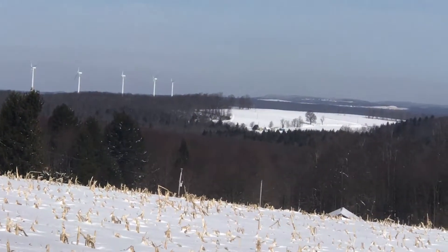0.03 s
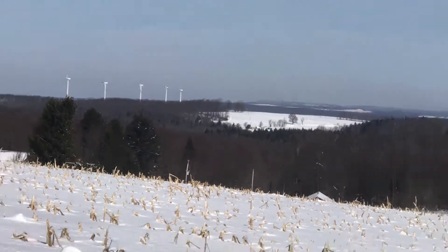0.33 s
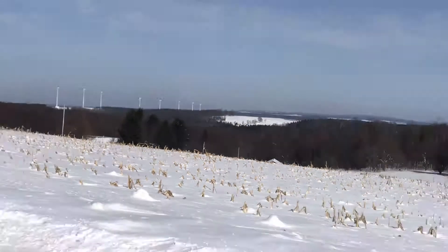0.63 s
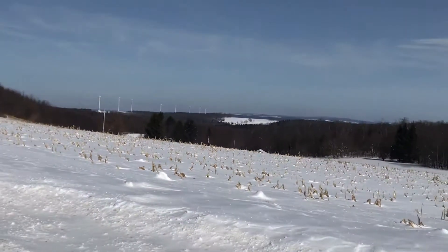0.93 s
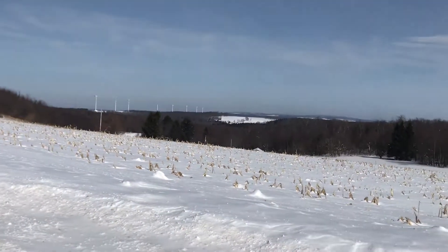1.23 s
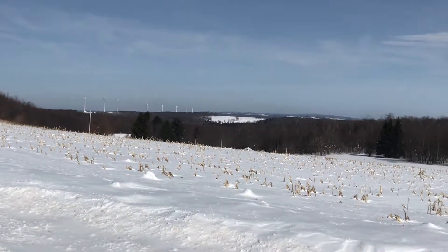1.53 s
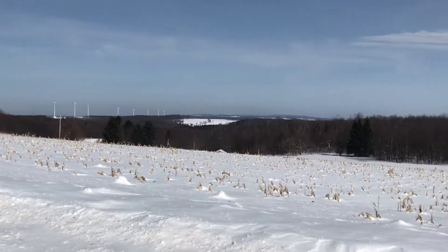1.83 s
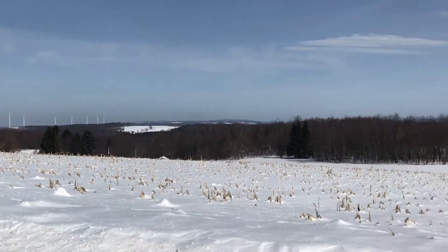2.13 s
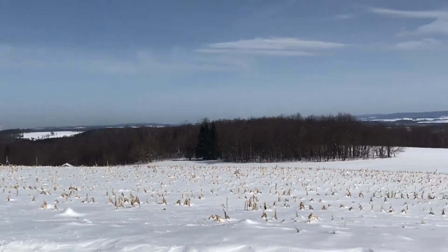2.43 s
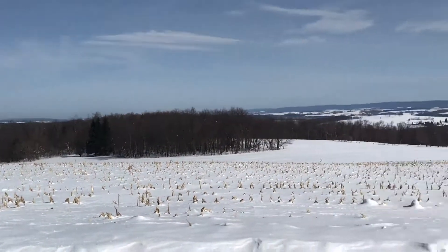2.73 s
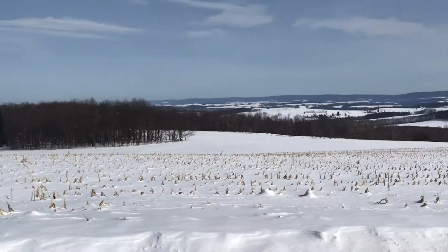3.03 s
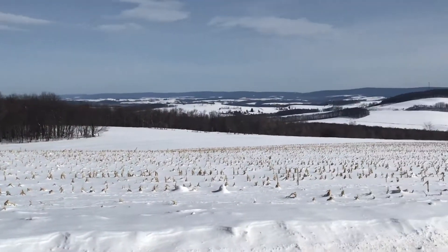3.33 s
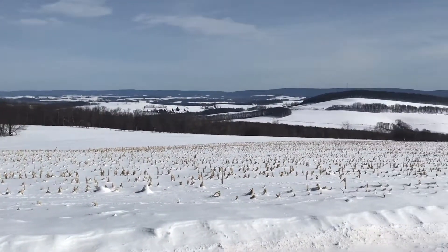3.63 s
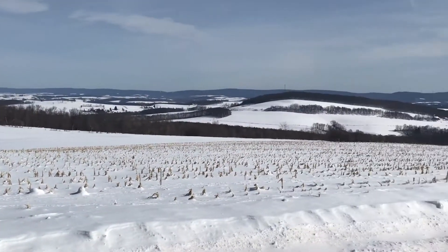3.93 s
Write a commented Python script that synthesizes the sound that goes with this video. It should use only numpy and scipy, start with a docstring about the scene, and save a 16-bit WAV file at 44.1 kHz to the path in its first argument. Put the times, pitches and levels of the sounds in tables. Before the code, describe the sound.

Light wind rushing over a faint low hum, briefly buffeting the microphone.

```python
"""A snowy field in a light wind, heard through a hand-held microphone that pans slowly across it.
From the start, turbulent air rushes over a low hum, probably an idling engine; faint whistles come and go.
At about 1 s a short gust buffets the microphone with eddies. From 2.1 to 3.2 s the microphone turns and
the rush changes colour, while a sleeve or glove rustles and ticks faintly against the camera."""
import sys
import numpy as np
from scipy import signal
from scipy.fft import rfft, irfft
from scipy.io import wavfile
from scipy.ndimage import uniform_filter1d

SR = 44100
rng = np.random.default_rng(int(sys.argv[2]) if len(sys.argv) > 2 else 0)


def store_wav(level_fs):
    """Save 16-bit WAV to argv[1]."""
    pcm = np.round(np.clip(np.atleast_2d(level_fs), -1, 1) * 32767)
    wavfile.write(sys.argv[1], SR, pcm.T.astype(np.int16))


N = 176400
TIME = np.arange(N) / SR


def from_db(db):
    """The decibel scale: amplitude grows tenfold for every 20 dB."""
    return 10 ** (np.asarray(db) / 20)


def unit_rms(x):
    """Normalisation to an rms of 1."""
    return x / np.sqrt(np.mean(x ** 2) + 1e-20)


def drift(corner_hz):
    """Low-pass filtering of noise gives a smooth random fluctuation; rms 1."""
    step, settling = 40, 2000
    pole = np.exp(-2 * np.pi * corner_hz * step / SR)
    white = rng.standard_normal(N // step + settling + 2)
    slow = signal.lfilter([1], [1, -2 * pole, pole * pole], white)[settling:]
    return np.interp(np.arange(N) / step, np.arange(len(slow)), unit_rms(slow))


def coloured(white, spectrum):
    """Spectral shaping of noise, falling a further 24 dB per octave below the first point; rms 1."""
    hz, db = np.transpose(spectrum)
    f = np.maximum(np.arange(N // 2 + 1) * SR / N, 1)
    gain = from_db(np.interp(np.log(f), np.log(hz), db)) * np.minimum(f / hz[0], 1) ** 4
    return unit_rms(irfft(rfft(white) * gain, N))


def band_noise(low_hz, high_hz):
    """Band-pass filtering gives stationary noise between two edges; rms 1."""
    edges_hz = [low_hz, np.clip(high_hz, low_hz + 10, SR / 2 - 20)]
    band = signal.butter(2, edges_hz, "band", fs=SR, output="sos")
    return unit_rms(signal.sosfilt(band, rng.standard_normal(N + SR // 10))[-N:])


def bells(rows):
    """Gaussian envelopes, summed: each has a peak time, a standard deviation and a peak level."""
    return sum(from_db(db) * np.exp(-.5 * ((TIME - peak) / sigma) ** 2) for peak, sigma, db in rows)


def engine_hum():
    """Periodic firing gives harmonics, which follow the slightly wandering rate of the idle."""
    # multiples of the firing rate
    orders = (2, 3, 6)
    # strength of each harmonic: level/dB
    levels = (-54, -53, -56)
    firing_hz, wander, waver_db = 21.2, 0.0114, 1
    phase = 2 * np.pi * np.cumsum(firing_hz * (1 + wander * drift(0.452))) / SR
    hum = np.zeros(N)
    for order, db in zip(orders, levels):
        amplitude = np.sqrt(2) * from_db(db + waver_db * drift(0.86))
        hum += amplitude * np.sin(order * phase + 2 * np.pi * rng.random())
    return hum


def rumble():
    """Turbulence at the microphone makes deep, steady pressure noise."""
    # spectral density: f/Hz, relative level/dB
    spectrum = [(38, 0.5), (52, -1.5), (66, 2), (90, -22), (300, -50), (15000, -120)]
    return from_db(-48.5) * coloured(rng.standard_normal(N), spectrum)


def squeaks():
    """Narrow-band noise is heard as a wavering pitch: here very faint, high peeps."""
    # peeps: peak t/s, standard deviation t/s, level/dB
    peeps = [(.51, .03, -88), (.6, .02, -90), (.76, .02, -87), (1.25, .015, -90), (1.39, .018, -89),
             (1.56, 0.035, -85)]
    return bells(peeps) * band_noise(low_hz=13450, high_hz=13780)


def whistles():
    """Resonance: air excites one narrow band after another, and each swells and fades."""
    # resonances: peak t/s, standard deviation t/s, level/dB, centre f/Hz, bandwidth f/Hz
    resonances = [(.89, 0.032, -64, 1620, 70), (1.0, .13, -65, 1450, 80), (1.16, 0.031, -64, 1570, 80),
                  (1.25, .16, -70.5, 1920, 60), (1.7, .18, -80, 4270, 450), (1.75, .15, -81, 6100, 1200),
                  (1.92, .27, -71, 2520, 130), (2.33, .12, -83, 5600, 600), (2.62, 0.16, -56.5, 1158, 170),
                  (3.005, 0.052, -58, 957, 90), (3.193, 0.043, -58, 1200, 70), (3.353, 0.12, -56, 877, 90),
                  (3.2, 0.37, -50.5, 347, 75), (3.97, 0.061, -54, 830, 70), (3.968, 0.1, -59, 690, 70),
                  (3.9, .25, -79, 5970, 380)]
    return sum(bells([(peak, sigma, db)]) * band_noise(hz - width / 2, hz + width / 2)
               for peak, sigma, db, hz, width in resonances)


def cloth_rustles():
    """Sliding friction of cloth on the camera makes bright, grainy noise that swells with each slide."""
    # slides: peak t/s, standard deviation t/s, level/dB
    slides = [(1.065, .025, -74), (1.995, .025, -82), (2.42, .02, -74), (2.52, .047, -74),
              (2.597, .025, -73), (2.73, 0.14, -77.5), (3.32, .045, -76)]
    # spectral density of the friction: f/Hz, relative level/dB
    spectrum = [(2500, -10), (5000, 0.5), (7500, -3), (9000, -4.5), (10500, -12), (12500, -6),
                (15500, -7.5)]
    friction = coloured(rng.standard_normal(N), spectrum)
    grain_db = 2.5 * drift(corner_hz=270)
    return bells(slides) * unit_rms(friction * from_db(grain_db))


def grip_ticks():
    """Impulsive excitation: each tiny slip of the grip is a treble burst that decays exponentially."""
    # slips: onset t/s, level/dB, centre f/Hz, decay constant t/s
    slips = [(1.141, -71, 6300, .003), (1.825, -68, 7000, .002), (2.293, -68, 7000, .002),
             (2.412, -64, 3500, .003), (2.502, -61, 12000, .00085), (2.546, -65, 11000, 0.00092),
             (2.5735, -60, 12000, .001), (2.799, -69, 8200, .002), (2.836, -66, 12000, .001),
             (2.874, -56, 3380, 0.0029), (3.194, -67, 7500, .007), (3.483, -63, 5000, .003),
             (3.712, -54, 2920, 0.0061)]
    edge_ratio = 1.29
    ticks = np.zeros(N)
    for start, db, hz, decay in slips:
        envelope = (TIME >= start) * np.exp(-np.clip((TIME - start) / decay, 0, 20))
        ticks += from_db(db) * envelope * band_noise(hz / edge_ratio, hz * edge_ratio)
    return ticks


def gust_buffets():
    """Each eddy striking the microphone is a dull pressure fluctuation: quick attack, hold, release."""
    # eddies: onset t/s, duration t/s, level/dB, lower edge f/Hz, upper edge f/Hz
    eddies = [(0.98, 0.02, -35, 45, 80.5), (1.203, 0.018, -27, 60, 116), (1.222, 0.025, -28, 36, 66),
              (1.246, .007, -23, 180, 262), (1.252, 0.0092, -23.5, 70, 139), (1.381, 0.03, -25.5, 31, 82),
              (1.415, 0.069, -32.5, 32, 68), (1.431, 0.01, -30, 110, 245), (1.471, 0.0086, -34, 100, 188),
              (1.616, 0.064, -37, 36, 60.6), (1.831, 0.019, -35, 43, 80), (2.892, 0.035, -40, 36, 60),
              (3.083, .029, -40, 40, 69.4)]
    attack_s, release_s, cutoff_hz = 0.0034, 0.003, 450
    pressure = np.zeros(N)
    for start, duration, db, low_hz, high_hz in eddies:
        age = TIME - start
        attack = np.clip(age / attack_s, 0, 1)
        release = np.exp(-np.clip((age - duration) / release_s, 0, 20))
        noise = band_noise(low_hz, high_hz)
        # dividing by the rms over one period keeps the eddy's strength even
        power = uniform_filter1d(noise ** 2, size=int(SR / np.sqrt(low_hz * high_hz)))
        pressure += from_db(db) * attack * release * noise / np.sqrt(power + 1e-9)
    return signal.sosfilt(signal.butter(2, cutoff_hz, fs=SR, output="sos"), pressure)


def wind_rush():
    """Turbulent air makes broadband noise, passing from one spectrum to another as the microphone turns."""
    # spectral density before the turn: f/Hz, relative level/dB
    spectrum_before = [(75, -13), (95, -6.5), (123, -1.5), (151, -3), (180, 0), (225, -1.5), (265, 0),
                       (325, -0.5), (408, -5), (467, -5), (599, -11), (720, -16.5), (850, -15.5),
                       (1020, -21.5), (1130, -17.5), (1410, -20), (1550, -23.5), (2120, -30), (2490, -29.5),
                       (2780, -36), (3050, -33), (3700, -39), (4300, -40), (5050, -49.5), (6100, -47.5),
                       (7700, -54), (9300, -54.5), (10400, -59), (11500, -56.5), (15500, -57.5)]
    # spectral density after the turn: f/Hz, relative level/dB
    spectrum_after = [(75, -1.5), (95, -4), (120, -7.5), (150, -3), (180, -1.5), (230, -4), (348, -0.5),
                      (410, -10), (511, -14), (627, -16), (780, -16), (865, -12.5), (960, -14),
                      (1200, -16.5), (1430, -20), (1520, -23), (1620, -24), (1810, -32.5), (2400, -31.5),
                      (2850, -33.5), (4200, -40), (5000, -45.5), (6000, -45), (7690, -52.5), (8600, -50.5),
                      (10400, -56.5), (11500, -54), (15500, -58)]
    # slow swell of the rush: t/s, relative level/dB
    swell = [(0, 1), (.6, 0.5), (1.1, 1.5), (1.6, 1), (2.0, 2.5), (2.6, -1), (3.3, -0.76), (4, -0.8)]
    turn_start_s, turn_end_s = 2.1, 3.2
    white = rng.standard_normal(N)
    before = from_db(-41.5) * coloured(white, spectrum_before)
    after = from_db(-40.5) * coloured(white, spectrum_after)
    turned = np.clip((TIME - turn_start_s) / (turn_end_s - turn_start_s), 0, 1)
    air = (1 - turned) * before + turned * after
    swell_db = np.interp(TIME, *np.transpose(swell))
    flutter_db = 0.52 * drift(corner_hz=15)
    return air * from_db(swell_db + flutter_db)


def scene():
    """Superposition: the pressures of all sources add at the one microphone."""
    steady = wind_rush() + rumble() + engine_hum()
    return (steady + gust_buffets() + whistles() + cloth_rustles() + grip_ticks() + squeaks())[None]


def record(dry):
    """Band limiting: the microphone loses the deepest bass, and the highest treble is cut steeply."""
    low_hz, high_hz = 30, 15800
    thinned = signal.sosfilt(signal.butter(4, low_hz, "high", fs=SR, output="sos"), dry)
    return signal.sosfilt(signal.ellip(10, .1, 70, high_hz, fs=SR, output="sos"), thinned)


dry = scene()
out = record(dry)
store_wav(out)
```